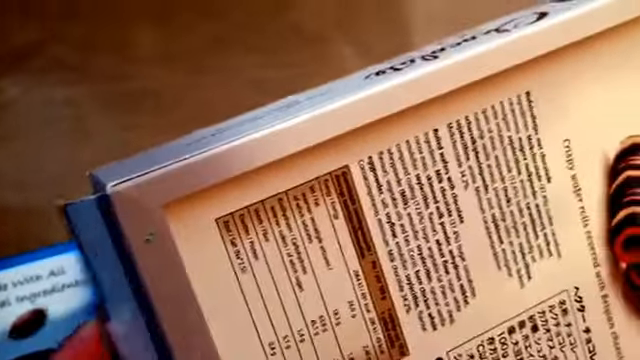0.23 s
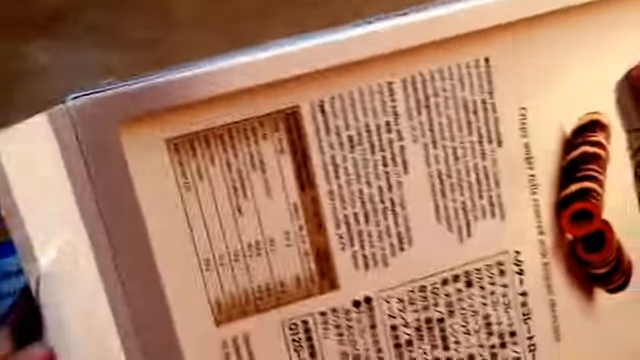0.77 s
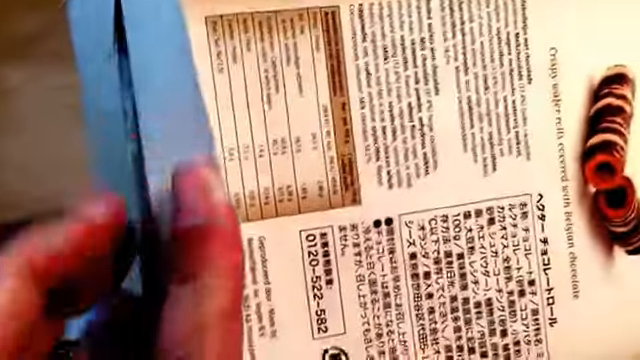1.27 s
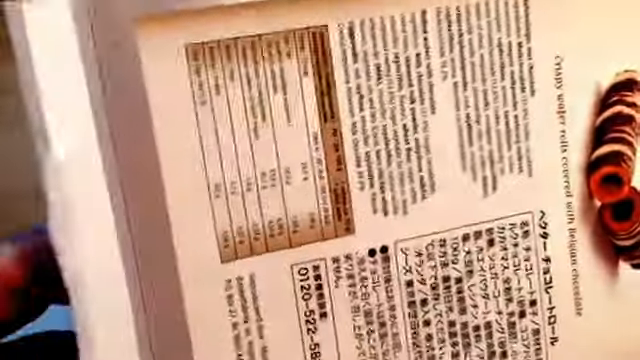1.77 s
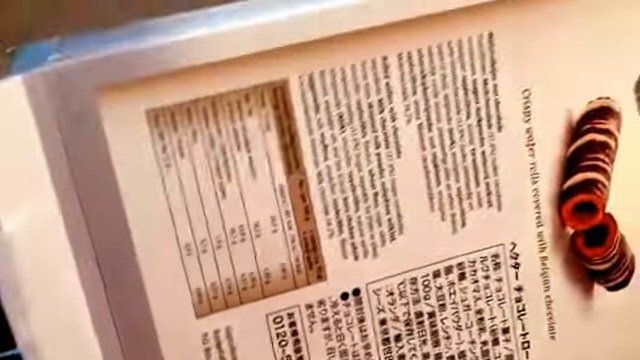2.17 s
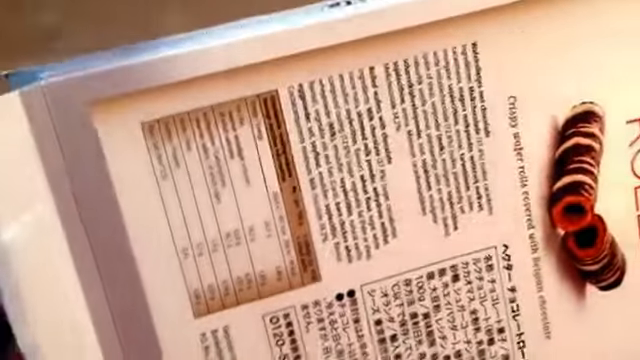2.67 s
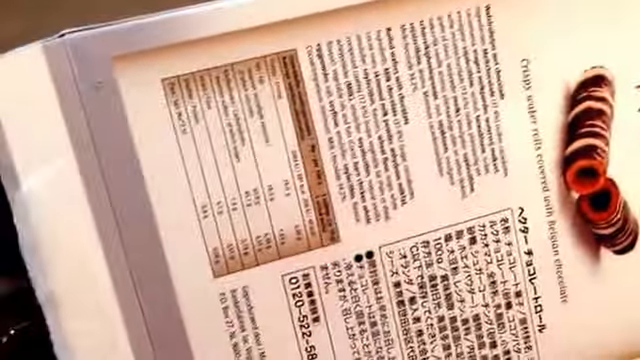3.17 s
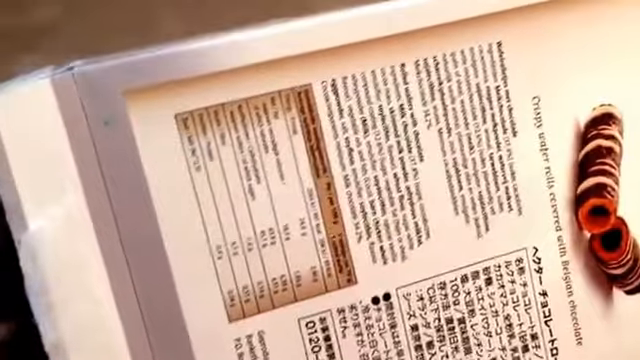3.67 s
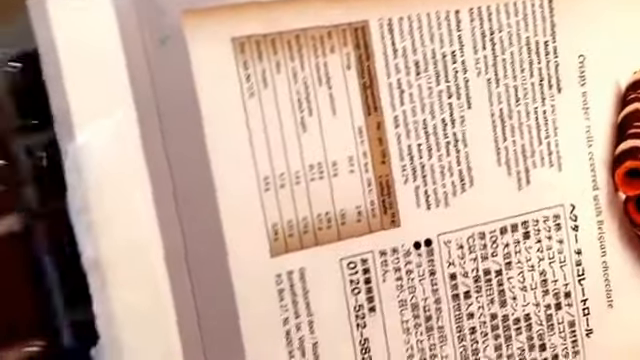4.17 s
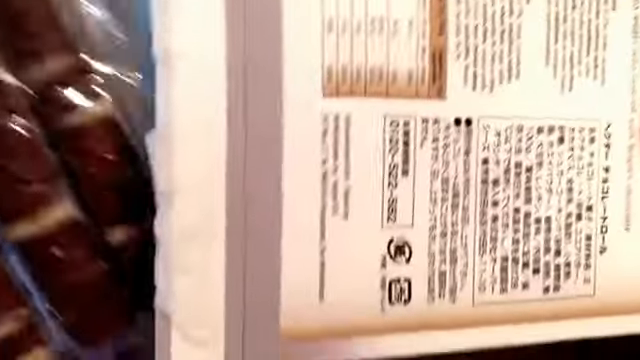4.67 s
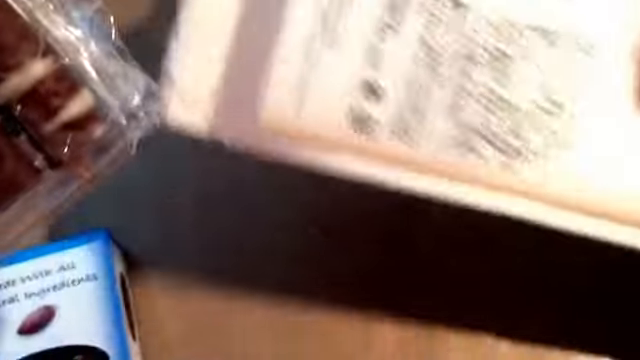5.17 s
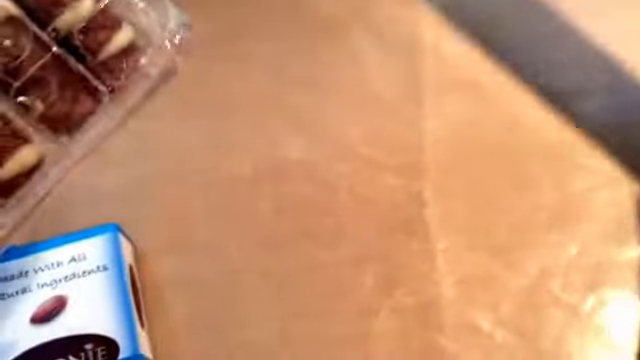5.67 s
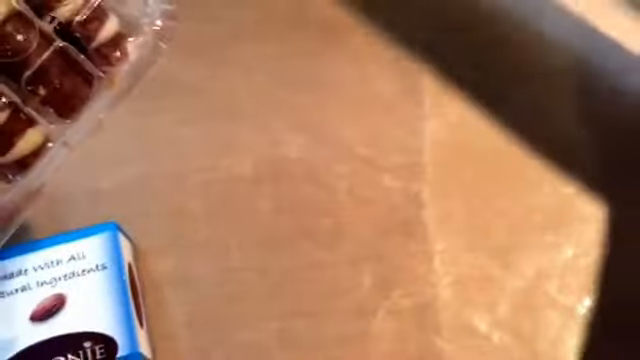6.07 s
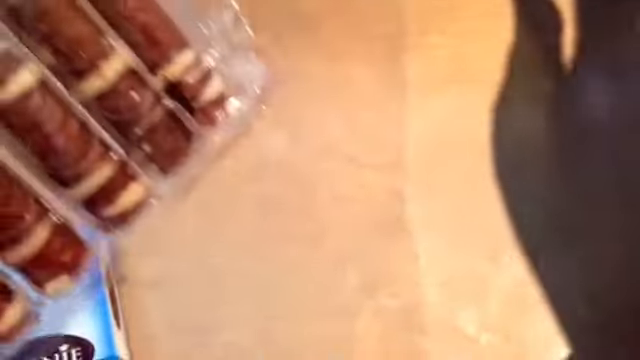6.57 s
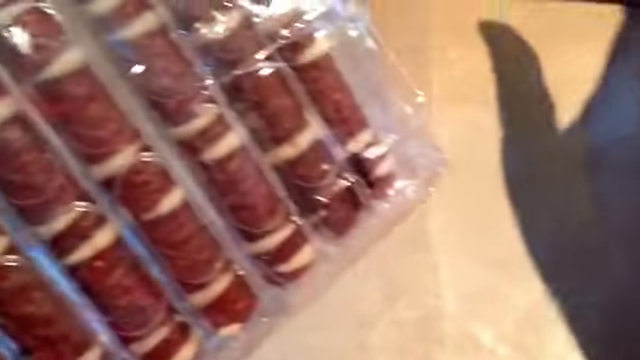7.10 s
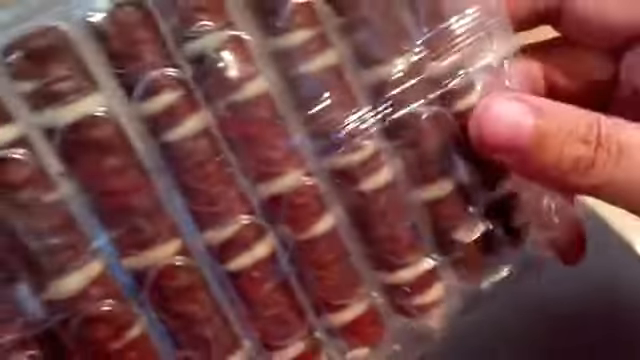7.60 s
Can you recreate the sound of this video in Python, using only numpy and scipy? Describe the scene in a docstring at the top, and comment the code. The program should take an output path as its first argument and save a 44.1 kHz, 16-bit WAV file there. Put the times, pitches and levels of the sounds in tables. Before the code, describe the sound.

A plastic tray in crinkly film is worked out of a cardboard box. Small grips and clicks build to sharp popping film, then two hoarse stick-slip scrapes of about half a second and one second. Handling thins to irregular crackles, the empty box is set down with dull hollow taps, a lull follows, and the film crackles again. Dry, close sound over low room rumble and faint hiss.

```python
"""A film-wrapped plastic tray is slid out of a cardboard box by hand, in separate grips and two long pulls.
Film: sharp buckling snaps and small ticks, each ringing its patch, over a rustle of countless creases.
Cardboard: stick-slip rubbing with ringing panels. Box: damped modes at each knock on table or hand.
Short reflections follow snaps, rustle and knocks; a low rumble and faint hiss fill the quiet room."""
import sys
import numpy as np
from scipy import signal
from scipy.fft import rfft, irfft
from scipy.io import wavfile
from scipy.ndimage import uniform_filter1d

SR = 44100
rng = np.random.default_rng(int(sys.argv[2]) if len(sys.argv) > 2 else 0)


def int16_out(signal):
    """Quantize to a 16-bit WAV file."""
    q = np.round(np.clip(np.atleast_2d(signal).T, -1, 1) * 32767)
    wavfile.write(sys.argv[1], SR, q.astype(np.int16))


N = 345725

# steady room sound: (frequency [Hz], relative density [dB per Hz])
ROOM_SPECTRUM = [(15, -69), (28, -38), (40, -19.5), (58, 1), (90, -9.5), (130, -17), (330, -32),
                 (900, -37.5), (3150, -71), (5000, -50), (13600, -55), (16500, -54.5)]
# separate grips and tugs: (start [s], held [s], rubbing on cardboard [dB], rustle of the film [dB])
GRIPS = [(0, .07, -53, -47.5), (0.131, 0.06, -48.5, -52), (0.293, 0.013, -52.5, -63),
         (0.412, 0.092, -48.5, -51), (.52, .04, -45, -49), (.6, .08, -44, -43.5), (0.719, .03, -53, -54),
         (.78, 0.036, -54, -62), (.84, .06, -46.5, -52.5), (.94, .07, -48.5, -55.5),
         (1.04, .06, -47.5, -46.5), (1.13, .07, -49, -53), (1.27, 0.039, -45, -50),
         (1.45, 0.039, -53, -55.5), (1.57, 0.075, -45, -50), (1.67, 0.032, -65, -50.5),
         (1.728, 0.035, -45, -46.5), (1.81, .12, -48, -54), (1.976, 0.024, -44, -45.5),
         (2.058, 0.028, -38, -41.5), (2.151, 0.021, -45, -34.5), (2.21, 0.042, -52, -55.5),
         (2.279, 0.09, -44, -36.5), (2.4, 0.017, -46, -52), (2.462, 0.057, -42.5, -35.5),
         (2.539, 0.1, -42.5, -43), (3.342, .14, -46.5, -41), (3.576, .02, -45, -51.5),
         (4.773, 0.031, -41.5, -42), (4.875, 0.049, -42, -48), (4.978, .03, -51, -61.5),
         (5.069, 0.12, -61, -72), (5.198, 0.042, -57, -58), (5.299, 0.02, -49, -51.5),
         (5.366, .02, -72, -60.5), (5.477, .01, -53, -59), (5.592, .09, -57, -47), (5.71, .01, -64, -57),
         (5.75, 0.024, -59, -65.5), (5.808, .02, -58, -63.5), (5.88, 0.064, -54.5, -47.5),
         (5.99, .03, -62, -59.5), (6.18, .08, -77, -58.5), (6.383, .05, -56, -61),
         (6.45, 0.022, -59, -65.5), (6.504, .02, -48, -52), (6.599, .015, -50, -61.5),
         (6.81, 0.024, -70, -71.5), (7.1, .14, -74.5, -67.5), (7.311, 0.029, -46, -45),
         (7.388, 0.033, -65, -48), (7.49, 0.032, -50, -53), (7.56, .12, -44, -41.5),
         (7.74, 0.043, -45, -43.5), (7.797, 0.027, -47, -30.5)]
# two pulls that slide the tray out, each a list of (time [s], rubbing [dB], rustle [dB])
PULLS = [
    [(2.68, -36, -41.5), (2.77, -32.5, -33), (3.06, -30.5, -35.5), (3.21, -34, -40.5), (3.26, -41, -49.5)],
    [(3.68, -38, -43), (3.81, -32, -38.5), (4.51, -31, -42.5), (4.57, -39, -41), (4.61, -36.5, -39),
     (4.71, -33, -37)],
]
# panels most excited as the tray travels: (time [s], frequency [Hz])
CONTACT = [(.62, 3060), (.9, 1360), (2.75, 1320), (2.88, 2060), (2.97, 1470), (3.12, 2480), (3.75, 1200),
           (4.1, 1610), (4.2, 2260), (4.301, 756), (4.42, 774), (4.5, 2030), (4.7, 2480), (5, 2820)]
# cardboard panel resonances: (frequency [Hz], width [Hz], level [dB])
PANELS = [(762, 41, -2.5), (1042, 65, -6), (1200, 35, -6), (1475, 71, -2), (2099, 72, -3), (2478, 94, -2),
          (3365, 290, -6.5)]
# broad colour of rubbed cardboard: (frequency [Hz], relative density [dB per Hz])
BOARD_SPECTRUM = [(60, -48.5), (180, -9.5), (450, -10), (900, -3), (1600, -1), (2600, -12.5), (3600, -13),
                  (8000, -22), (12000, -55.5)]
# colour of the film: (frequency [Hz], relative density [dB per Hz])
FILM_SPECTRUM = [(250, -10.5), (600, -30), (1200, -1), (2700, 3.5), (4800, -3.5), (6100, -0.5), (10000, -4),
                 (10700, -6), (11600, -2), (15700, -0.5), (16500, -19.5)]
# clear film buckles: (time [s], crack peak [dB], patch pitch [Hz], thump into the box re crack [dB])
SNAPS = [(0.0096, -31, 4540, -21), (0.0384, -32, 4410, -44), (0.0656, -29, 4200, -18),
         (0.0765, -20, 2260, -34), (0.088, -27.5, 5160, -11.5),  (0.208, -31, 3200, -22),
         (0.308, -28.5, 4570, -10.5), (0.51, -18.5, 3550, -22), (0.5552, -26, 4030, -23),
         (0.5972, -17, 3840, -24), (0.6687, -21, 2760, -8.5), (0.893, -24.5, 4570, -6),
         (0.926, -34, 1900, 0), (1.0662, -39, 3800, -3), (1.179, -17.5, 4370, -31), (1.216, -26, 2090, -9),
         (1.2619, -12.5, 6760, -45), (1.3392, -15, 7000, -29), (1.348, -20, 3600, -20),
         (1.4496, -31, 1770, -9),  (1.5713, -23, 4020, -10.5), (1.6166, -30.5, 1720, 4),
         (1.6362, -26.5, 4350, 1.5),  (1.712, -23.5, 2050, -9), (1.7278, -21, 11700, -12),
         (1.7472, -22.5, 7480, -13), (1.7656, -14, 2960, -34), (1.8067, -13, 2100, -14.5),
         (1.8587, -24, 2160, -16), (1.8773, -22, 4100, -11), (1.8947, -17.5, 12850, -30),
         (1.9162, -9.5, 4120, -38), (1.9195, -14.5, 6240, -23), (1.925, -17, 3670, -18),
         (1.9327, -22.5, 2760, -23), (1.9955, -11, 4130, -24), (2.0697, -24, 3430, -21),
         (2.098, -17, 9350, -29), (2.1075, -15.5, 2840, -14), (2.145, -26, 9450, -36),
         (2.2253, -19.5, 12000, -31), (2.2924, -15.5, 8310, -15), (2.3094, -7.5, 5200, -21),
         (2.3347, -12, 10300, -26), (2.3514, -12, 7900, -35), (2.369, -12.5, 12500, -14),
         (2.3789, -13, 2900, -13), (2.419, -20, 4190, -14), (2.4237, -23, 3170, -20),
          (2.4476, -18, 8430, -19), (2.4668, -11, 6650, -23), (2.4718, -7, 2370, -23),
          (2.4953, -16, 6080, -33), (2.511, -7.5, 9600, -26), (2.5301, -13.5, 7900, -20),
          (2.5477, -6, 8750, -18), (2.5572, -18, 9390, -22),  (2.6176, -6.5, 9400, -14.5),
         (2.831, -11.5, 5400, -8), (2.844, -15, 3710, -6), (2.867, -13, 7860, -16), (3.0414, -17, 4960, -7),
         (3.0654, -11.5, 2160, -21),  (3.155, -15.5, 4530, -7.5), (3.188, -15, 10900, -24),
         (3.2151, -16.5, 10840, -11), (3.3, -23.5, 5430, -10), (3.3111, -14, 3830, -14),
         (3.3287, -22, 6500, -23), (3.335, -26, 5780, -3), (3.3588, -21, 5050, -12),
         (3.3702, -17.5, 4600, -21), (3.3882, -10, 6370, -20), (3.3988, -6, 4970, -19),
         (3.4071, -5.5, 5160, -23), (3.4318, -15, 6500, -21), (3.435, -13.5, 11600, -10.5),
         (3.4514, -13, 9900, -20), (3.469, -14.5, 8080, -32), (3.4745, -7.5, 8350, -47),
         (3.4842, -5.5, 6500, -22), (3.5752, -10, 5800, -22), (3.5785, -12, 11900, -28),
         (3.6072, -21, 3640, -10), (3.623, -21.5, 4400, -14), (3.6341, -6.5, 4550, -22),
         (3.6471, -6, 5500, -21), (3.673, -20, 10480, -15), (3.762, -14.5, 9800, -10),
         (3.8286, -17.5, 1810, -3.5), (4.0293, -19, 5150, -43), (4.088, -18, 4130, -31),
          (4.4698, -18, 9500, -12), (4.591, -19, 9170, -8), (4.614, -9.5, 5100, -11.5),
         (4.6683, -22, 2820, -2), (4.857, -27.5, 4170, -6), (4.916, -26, 5210, -24),
          (4.9761, -20.5, 4520, -5.5), (5.004, -30, 2020, -20), (5.027, -34.5, 2380, -22),
         (5.072, -35.5, 3500, -17), (5.1037, -37.5, 2160, -13), (5.114, -37.5, 2150, -12),
         (5.173, -36, 2000, -4), (5.218, -23.5, 3340, -15), (5.2377, -21.5, 5740, -9.5),
          (5.2736, -30.5, 2600, -2), (5.289, -17, 12400, -12.5), (5.2974, -26, 4550, -11),
         (5.313, -14.5, 5940, -12.5), (5.3215, -14, 3970, -16), (5.3552, -22, 2760, -9),
         (5.381, -28, 1830, -30), (5.4713, -24.5, 3460, -5), (5.4762, -18.5, 8800, -11),
         (5.4897, -33, 3620, -18),  (5.587, -20, 2230, -14), (5.593, -21.5, 7040, -23),
         (5.6055, -22, 4860, -14), (5.624, -19.5, 7200, -12), (5.6311, -20, 3150, -20),
         (5.642, -26, 5490, -21), (5.6734, -27, 3230, -13), (5.6874, -28, 4310, -25),
          (5.7074, -25, 4830, -11.5), (5.719, -15, 6900, -19), (5.744, -13.5, 6300, -33),
         (5.7739, -18.5, 8600, -16), (5.7972, -20, 12400, -14), (5.8372, -19.5, 5050, -13.5),
         (5.8572, -22, 5360, -17), (5.8944, -34, 5010, 2.5), (5.9345, -18.5, 9280, -16),
         (5.9392, -13, 10800, -22.5), (5.9486, -18.5, 6400, -36), (6.1727, -34.5, 5900, -7),
         (6.2029, -14, 5440, -19), (6.2095, -21.5, 2510, -16), (6.3666, -36, 1980, 14),
         (6.5111, -20, 2640, -8.5),  (6.6676, -23.5, 6300, -22), (6.6891, -39, 2910, -12),
         (6.7843, -31, 3900, -24), (6.8298, -33.5, 3070, -14), (7.0063, -39, 5140, -18),
         (7.0755, -43, 5230, -9),  (7.093, -42.5, 1700, -3), (7.158, -33.5, 2780, -8),
         (7.186, -35, 1790, -3), (7.194, -29.5, 3400, -6.5), (7.2649, -29, 4050, -14),
         (7.2691, -17.5, 4100, -13), (7.281, -33, 3140, -4), (7.314, -22.5, 4650, -10.5),
         (7.3822, -7, 5600, -21.5),  (7.394, -33, 4100, -13), (7.4086, -24, 6230, -12),
         (7.428, -19, 2510, -23), (7.4776, -33, 3050, -15), (7.4941, -11.5, 4500, -9),
         (7.5174, -16, 9400, -18), (7.5824, -22.5, 3000, -9.5), (7.6435, -15, 5780, -15),
         (7.6546, -16, 4460, 1), (7.66, -19.5, 2150, -14.5), (7.6804, -18, 7900, -30),
         (7.685, -15, 5300, -11), (7.717, -21.5, 3600, -13), (7.755, -17.5, 3510, -14),
         (7.779, -24.5, 7020, -5), (7.8029, -8, 3600, -19), (7.8109, -19, 6230, -7),
         (7.8171, -14.5, 8700, -18), (7.824, -17.5, 6000, -10)]
# box against table or hand: (time [s], peak [dB], panel struck [Hz], hollow low part [dB])
KNOCKS = [(0.727, -33, 427, -6), (1.617, -31, 600, -30), (1.633, -39, 710, -17), (1.802, -33.5, 346, -15),
          (2.368, -42, 1050, -16), (2.842, -26.5, 880, -40.5), (3.064, -22, 1270, -44),
          (3.364, -31.5, 1220, -16), (3.484, -28, 627, -20), (3.627, -29.5, 794, -16),
          (4.797, -29, 645, -10), (4.975, -34, 750, -11.5), (5.93, -28, 600, -21), (6.364, -19, 704, -13),
          (6.384, -23, 654, -4), (6.405, -25, 360, -5), (6.415, -26.5, 298, -6), (6.494, -29.5, 870, -11),
          (6.525, -33, 970, -4), (6.563, -28, 870, -15), (6.589, -28, 830, 1), (6.6, -21.5, 870, -8),
          (6.616, -31.5, 357, -4.5), (6.783, -45, 602, -20), (7.735, -40, 350, -13)]
# modes of the empty box: (frequency [Hz], level [dB], t60 [s])
BOX_MODES = [(92, -3.5, 0.044), (172.6, -4, 0.14), (213, 0, 0.081), (363, -4.5, 0.068), (424, -2.5, 0.042),
             (628, 0, 0.031), (803, -46, 0.018), (870, -1, 0.051), (1015, -4, 0.036), (1280, 0, 0.018),
             (1910, 3, 0.017)]
# decay of reflections from nearby surfaces: (frequency [Hz], t60 [s])
TAIL_T60 = [(300, 0.13), (790, 0.1), (2090, 0.0099), (5510, 0.041), (14600, 0.011)]

ROOM_RMS_DB, REFLECTIONS_DB = -54, -12.0
EDGE_HZ = 16200
RISE_DB_PER_S, FALL_DB_PER_S = 448, 381.5  # every grip and pull
RESTING_RUB_DB, RESTING_RUSTLE_DB = -72.5, -75.5  # hands still, holding
FULL_PRESSURE_DB = -43.0  # rubbing level at which the whole wall moves
HOLLOW_TOP_HZ = 280  # modes below this belong to the air in the box
TICK_COUNT, TICK_OVER_RUSTLE_DB = 80, 22
TICK_CAP_DB, TICK_SPREAD_DB = -35, 3  # the cap applies before the spread
TICK_CENTRE_HZ, TICK_LOG_HZ_SPREAD = 3500, 0.6
TICK_THUMP_DB, TICK_THUMP_SPREAD_DB = -12, 5


def gain_of(db):
    """Decibels to amplitude gain."""
    return 10 ** (np.asarray(db) / 20)


def evened(x):
    """Scales to rms 1."""
    return x / np.sqrt(np.mean(x ** 2) + 1e-20)


def read(points, hz):
    """Interpolates a table on a log-frequency axis."""
    table_hz, value = np.transpose(points)
    return np.interp(np.log(hz + 1), np.log(table_hz + 1), value)


def add(mix, start_s, sound):
    """Mixes a sound in at start_s, cut at the end of the mix."""
    part = mix[round(start_s * SR):][:len(sound)]
    part += sound[:len(part)]


def colour(points, size=2048):
    """Minimum-phase impulse response with the given spectrum."""
    hz = abs(np.fft.fftfreq(size, 1 / SR))
    log_gain = np.log(gain_of(np.maximum(read(points, hz), -100)))
    response = np.fft.ifft(np.exp(np.conj(signal.hilbert(log_gain)))).real
    return response[:size // 2]


def ring(x, hz, width_hz):
    """Two-pole resonance with gain 1 at its peak."""
    b, a = signal.iirpeak(min(hz, SR / 2.2), hz / width_hz, SR)
    return signal.lfilter(b, a, x)


def wander(points_per_s):
    """Straight lines between 1000 normal random points; the last value holds once they run out."""
    points = rng.standard_normal(1000)
    return np.interp(np.arange(N) / SR * points_per_s, np.arange(1000), points)


def slips(per_s, spread_db, clump_db, clumps_per_s):
    """Random train of tiny releases of uneven size, clumped by a wandering level, at rms 1."""
    uneven_db = spread_db * np.minimum(rng.exponential(1, N), 4)
    size = gain_of(uneven_db + clump_db * wander(clumps_per_s))
    return evened(size * rng.standard_normal(N) * (rng.random(N) < per_s / SR))


def room_tone():
    """Steady rumble and hiss: noise shaped in frequency."""
    spectrum = rfft(rng.standard_normal(N)) * gain_of(read(ROOM_SPECTRUM, np.fft.rfftfreq(N, 1 / SR)))
    return gain_of(ROOM_RMS_DB) * evened(irfft(spectrum, N))


def hands(column):
    """Gain of hand work (1 rubbing, 2 rustle): power sum of grips and pulls over resting hands."""
    t = np.arange(0, N / SR + .002, .001)
    grips = [[(s, rub, film), (s + held, rub, film)] for s, held, rub, film in GRIPS]
    power = gain_of((0, RESTING_RUB_DB, RESTING_RUSTLE_DB)[column]) ** 2
    for move in map(np.array, grips + list(PULLS)):
        before_s = np.maximum(move[0, 0] - t, 0)
        after_s = np.maximum(t - move[-1, 0], 0)
        edges_db = RISE_DB_PER_S * before_s + FALL_DB_PER_S * after_s
        power = power + gain_of(np.interp(t, move[:, 0], move[:, column]) - edges_db) ** 2
    return np.interp(np.arange(N) / SR, t, np.sqrt(power))


def patchy(x, depth_db):
    """Colour drifts as hands and surfaces move: bands of about 500 Hz swell and fade over about 60 ms."""
    z = signal.stft(x, nperseg=512)[2]
    field = uniform_filter1d(rng.standard_normal(z.T.shape), size=10, axis=0)  # frames
    field = uniform_filter1d(field, size=6, axis=1)  # bins
    drifted = z * gain_of(depth_db * evened(field).T)
    # keep the short-term loudness
    power, drifted_power = [uniform_filter1d((abs(v) ** 2).sum(0), size=9) + 1e-20 for v in (z, drifted)]
    levelled = drifted * np.sqrt(power / drifted_power)
    return evened(signal.istft(levelled, nperseg=512)[1][:N])


def rubbing():
    """Dense stick-slip shakes the cardboard; its panels ring in turn as the contact moves."""
    broad = evened(signal.oaconvolve(slips(9000., 3.1, 1., 60.), colour(BOARD_SPECTRUM))[:N])
    contact_s, contact_hz = np.transpose(CONTACT)
    contact_hz = np.interp(np.arange(N) / SR, contact_s, contact_hz)
    panels = np.zeros(N)
    for hz, width_hz, db in PANELS:
        near_db = 7 * np.exp(-(np.log(hz / contact_hz) / .14) ** 2)
        fibres = slips(1200., 2.9, 0, 1)
        panels += gain_of(db + near_db + 1.0 * wander(6.6)) * evened(ring(fibres, hz, width_hz))
    panels_db = -1
    rub = patchy(broad + gain_of(panels_db) * evened(panels), depth_db=2.5)
    # a light touch does not move the whole wall: the low end comes in with pressure
    thin = signal.sosfilt(signal.butter(2, 800., "high", fs=SR, output="sos"), rub)
    level = hands(column=1)
    pressure = np.clip(level / gain_of(FULL_PRESSURE_DB), 0, 1)
    return level * (pressure * rub + (1 - pressure) * thin)


def rustle():
    """Countless small film creases: a fine fizz, and crackles that each ring their own patch."""
    clumps = gain_of(1.5 * wander(60.))
    drive = slips(7000., 1.0, 3.8, 150.)  # fizz
    t = np.arange(200) / SR
    crackle_db, grain_t60_s = -13, 0.0012
    for hz in np.geomspace(1800., 13000., num=10):
        burst = rng.standard_normal(len(t)) * gain_of(-60 * t / grain_t60_s)
        grain = ring(burst, hz, 0.65 * hz)
        crackle = signal.oaconvolve(slips(60., 2.5, 4.5, 27.0), grain)[:N]
        drive += gain_of(crackle_db) * evened(crackle)
    coloured = signal.oaconvolve(drive, colour(FILM_SPECTRUM))[:N]
    return hands(column=2) * patchy(clumps * coloured, depth_db=3.5)


def ticks():
    """Small buckles at chance moments, more often and louder while the film rustles; rows like SNAPS."""
    film = hands(column=2)
    busy = np.cumsum(film ** 0.11)
    when = rng.random(TICK_COUNT)
    size, pitch, thump = rng.standard_normal((TICK_COUNT, 3)).T
    at = np.clip(np.searchsorted(busy, when * busy[-1]), 200, N - 1)
    db = np.minimum(20 * np.log10(film[at]) + TICK_OVER_RUSTLE_DB, TICK_CAP_DB) + TICK_SPREAD_DB * size
    hz = np.clip(TICK_CENTRE_HZ * np.exp(TICK_LOG_HZ_SPREAD * pitch), 1500, 13000)
    return list(zip(at / SR, db, hz, TICK_THUMP_DB + TICK_THUMP_SPREAD_DB * thump))


def snaps():
    """Each buckle creeps, lets go sharply and shudders for a few ms; it rings its patch and thumps the box."""
    out, t = np.zeros(N), np.arange(-100, 700) / SR  # release at t = 0
    film = colour(FILM_SPECTRUM)[:300]
    buckles = ticks() + list(SNAPS)
    noise = rng.standard_normal((len(buckles), 2, len(t)))
    chance = rng.standard_normal((len(buckles), 3))
    thump_band = signal.butter(2, [300, 1500], "band", fs=SR, output="sos")
    after = np.maximum(t, 0)
    creep = gain_of(-19.0 + 60 * np.minimum(t, 0) / 0.0087)
    aftershake = gain_of(-15.0 - 60 * after / 0.024)
    for (s, db, hz, thump_db), (shudder, shake), (slack, *others) in zip(buckles, noise, chance):
        shudder_t60_s = 0.002 * np.exp(0.073 * slack)
        shape = gain_of(-60 * after / shudder_t60_s) + aftershake
        drive = shudder * np.where(t < 0, creep, shape) + 0.44 * (t == 0)
        # large slack patches are dull, small tight ones bright
        dull_b, dull_a = signal.butter(2, min(2.9 * hz, 18000), fs=SR)
        broad = signal.lfilter(dull_b, dull_a, np.convolve(drive, film)[:len(t)])
        # neighbouring patches ring along at unrelated pitches
        side_hz = np.clip(4500 * np.exp(0.564 * np.array(others)), 1200, 14000)
        side = sum(ring(drive, f, 0.13 * f) for f in side_hz)
        patch = ring(drive, hz, 0.18 * hz)
        crack = evened(broad) + gain_of(-6.5) * evened(patch) + gain_of(-14.5) * evened(side)
        thump = signal.sosfilt(thump_band, shake * (t >= 0) * gain_of(-60 * after / 0.013))
        snap = crack / abs(crack).max() + gain_of(thump_db) * thump / abs(thump).max()
        add(out, s + t[0], gain_of(db) * snap)
    return out


def knocks():
    """Blows ring the box: the struck panel most, the hollow by how freely it is held; pitches vary a little."""
    out, t = np.zeros(N), np.arange(6000)[:, None] / SR
    hz, mode_db, t60_s = np.transpose(BOX_MODES)
    detunes = rng.standard_normal((len(KNOCKS), len(BOX_MODES)))
    for (s, db, struck_hz, hollow_db), detune in zip(KNOCKS, detunes):
        away_db = -18. * np.minimum(abs(np.log(hz / struck_hz)), .9)
        level_db = mode_db + np.where(hz < HOLLOW_TOP_HZ, hollow_db, away_db)
        tones = np.sin(2 * np.pi * hz * (1 + 0.029 * detune) * t)
        modes = gain_of(level_db - 60 * t / t60_s) * tones
        blow = modes.sum(1) * (1 - np.exp(-t[:, 0] / .0015))  # soft onset
        add(out, s, gain_of(db) * blow / abs(blow).max())
    return out


def reflections(x):
    """Table, box and hands throw back a short tail: sparse random taps, each band dying at its own speed."""
    taps = np.zeros(8192)
    at = np.arange(60, 8000, 20) + rng.integers(0, 20, 397)
    taps[at] = rng.choice([-1., 1.], 397)
    hz, t, z = signal.stft(taps, SR, nperseg=128)
    decay = gain_of(-60 * t / read(TAIL_T60, hz)[:, None])
    tail = signal.istft(z * decay, SR, nperseg=128)[1]
    return signal.oaconvolve(x, tail / np.linalg.norm(tail))[:N]


def scene():
    """Snaps, rustle and knocks with their reflections, plus dry rubbing and the room."""
    near = snaps() + rustle() + knocks()
    mix = near + gain_of(REFLECTIONS_DB) * reflections(near) + rubbing() + room_tone()
    return mix[None]


def record(dry):
    """Linear-phase low-pass: the band limit."""
    lowpass = signal.firwin(255, EDGE_HZ, window=("kaiser", 7), fs=SR)
    return signal.oaconvolve(dry, lowpass[None], "same")


dry = scene()
out = record(dry)
int16_out(out)
```